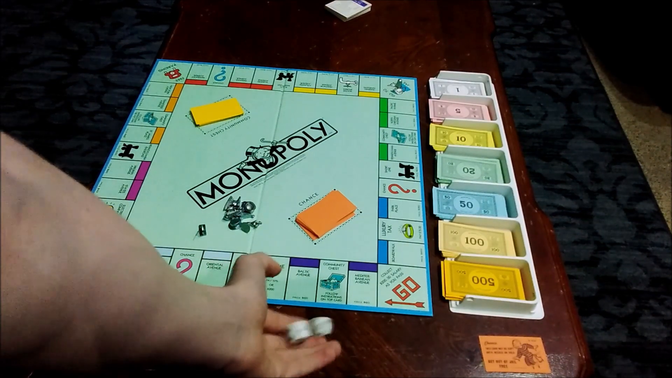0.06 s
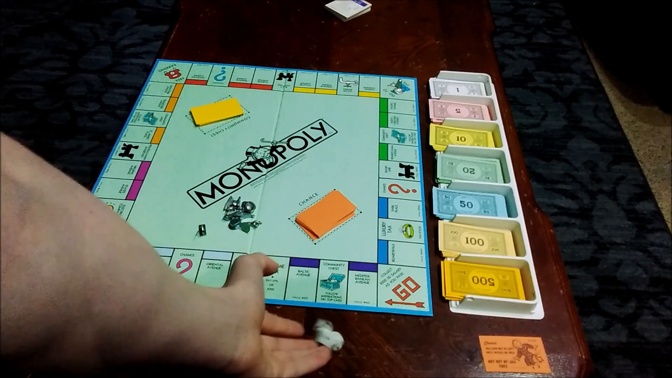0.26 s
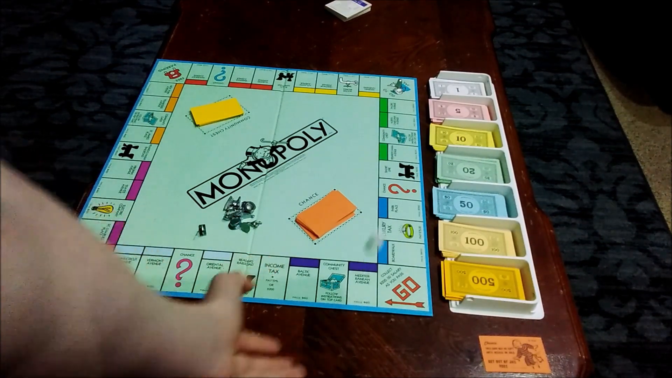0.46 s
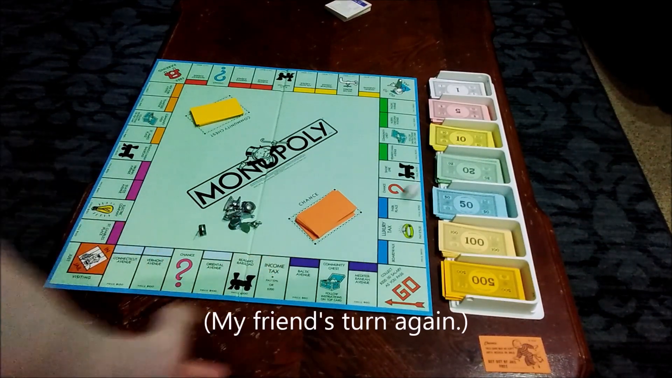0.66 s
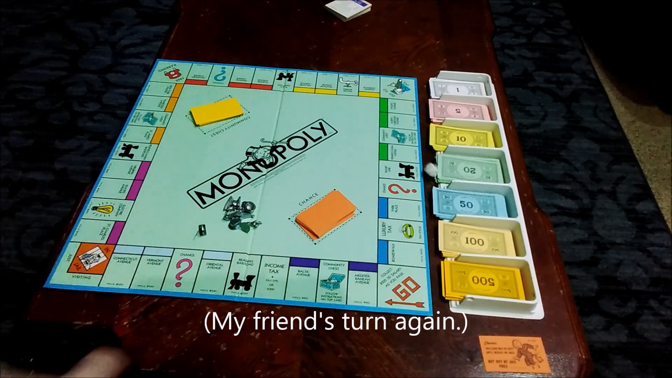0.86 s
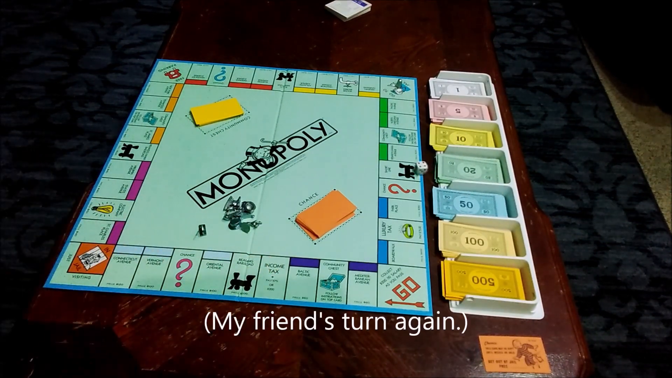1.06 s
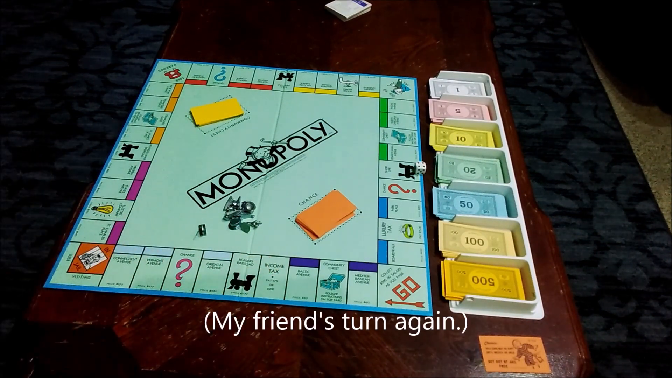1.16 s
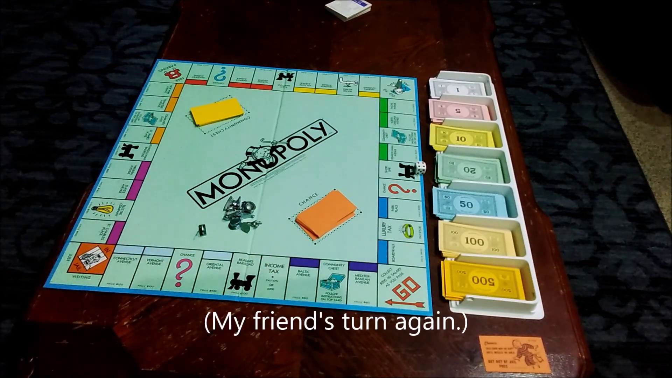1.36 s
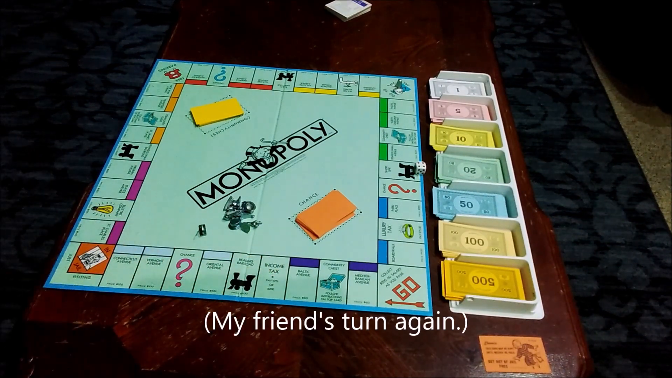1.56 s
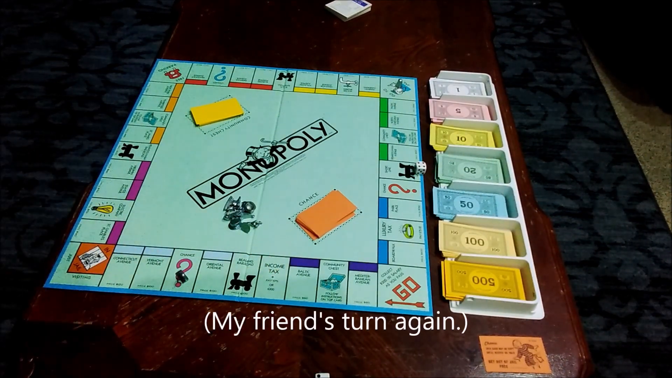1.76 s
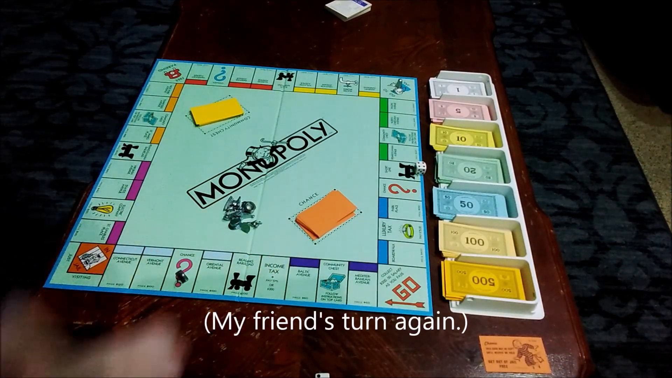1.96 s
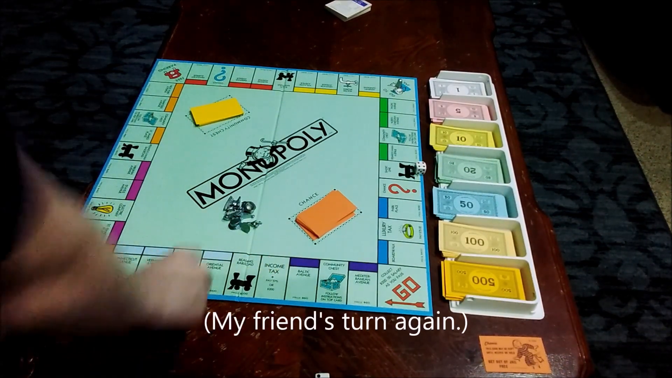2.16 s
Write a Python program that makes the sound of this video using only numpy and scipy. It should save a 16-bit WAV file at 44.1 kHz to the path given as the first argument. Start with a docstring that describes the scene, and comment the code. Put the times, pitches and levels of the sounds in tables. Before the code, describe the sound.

Two plastic dice thrown on a cardboard game board bounce, clack together, roll and knock a tray

```python
"""Over steady hum and hiss, two plastic dice are thrown on a cardboard game board lying on a wooden table.
They bounce, clack together, roll away and knock the tray at the far edge; the last tips over with a dull thud.
The sound then drops out for a moment, and later comes one faint tick. Blows are short coloured clicks,
answered by nearby surfaces and a small furnished room; the wood adds damped sines, and hum and hiss are
filtered noise."""
import sys
import numpy as np
from scipy import signal
from scipy.fft import rfft, irfft, next_fast_len
from scipy.io import wavfile
from scipy.ndimage import map_coordinates

SR = 44100
rng = np.random.default_rng(int(sys.argv[2]) if len(sys.argv) > 2 else 0)


def materialize(psi):
    """Save the field psi as 16-bit PCM at rate SR to the path in sys.argv[1].

    A 1-D psi becomes a single channel; in a 2-D psi each row is a channel.
    """
    bounded = np.clip(np.atleast_2d(psi).T, -1, 1)
    quanta = np.round(bounded * 32767).astype(np.int16)
    wavfile.write(sys.argv[1], SR, quanta)


def boost(x):
    """Linear amplitude factor 10**(x/20) for a level x in decibels (scalar or array-like)."""
    u = np.asarray(x, float) / 20
    return 10 ** u


N = 97020  # length in samples

# colour of a blow on the board: f/Hz, level/dB
BOARD_COLOUR = [(20, -78.5), (130, -37.5), (300, -23), (800, -11), (1400, -0.5), (2200, -0.5), (3000, -10),
                (4500, -14.5), (5300, -19), (6000, -44), (16000, -65.5)]
# colour of a blow on the hard plastic die: f/Hz, level/dB
DIE_COLOUR = [(20, -82), (3000, -35), (5500, -17.5), (6800, 1), (7900, 6), (9500, -4.5), (12000, -10),
              (16000, -25.5)]
# ringing modes of the wooden table: f/Hz, level/dB, time to fall by 60 dB/s
WOOD_MODES = [(161.5, -4, 0.31), (221.4, -6, 0.69), (279.4, -1.5, .25), (346.4, 3, .3), (477, 2, 0.32),
              (588.5, 0.5, 0.19), (737, -0.5, .3), (885, 1.5, 0.17), (1428, 1.5, 0.27), (1720, -5.5, .2),
              (1900, -7.5, 0.6), (2220, -8.5, .15)]
SCATTER_DB = 1.5  # how much the colour varies from blow to blow


def unit(x):
    """Scale a sound to an rms of 1."""
    return x / np.sqrt(np.mean(x ** 2) + 1e-20)


def along(points, hz):
    """Read a curve of (Hz, value) points, with straight lines on a log frequency axis."""
    f, v = np.transpose(points)
    return np.interp(np.log(hz + 1), np.log(f + 1), v)


def filtered(x, response):
    """Filter a sound by multiplying its spectrum by a response of frequency."""
    m = next_fast_len(len(x) + 8192)
    spectrum = rfft(x, m) * response(np.fft.rfftfreq(m, 1 / SR))
    return irfft(spectrum, m)[:len(x)]


def add(track, s, sound):
    """Mix a sound into a track at time s, in seconds."""
    part = track[round(s * SR):][:len(sound)]
    part += sound[:len(part)]


def room_tone():
    """Hiss and rumble are shaped noise; a narrow band of noise makes a hum that wavers."""
    # colour of the hiss and rumble: f/Hz, level/dB (per Hz)
    air_colour = [(12, -10), (20, 1.5), (91, -11.5), (123, -2.5), (146, -13.5), (241, -14), (277, -17),
                  (422, -19.5), (1150, -26.5), (1440, -29.5), (16000, -36)]
    air_db, hum_db = -58, -70.5  # rms levels
    hum_hz, hum_width_hz = 127, 8
    air = unit(filtered(rng.standard_normal(N), lambda hz: boost(along(air_colour, hz))))
    hum = unit(filtered(rng.standard_normal(N), lambda hz: np.exp(-((hz - hum_hz) / hum_width_hz) ** 2)))
    return boost(air_db) * air + boost(hum_db) * hum


def space(direct_db=0, near_db=0, room_db=0):
    """A fresh answer to one blow: direct sound, near surfaces with board chatter, and the room's tail."""
    # how long the room rings: f/Hz, time to fall by 60 dB/s
    room_t60 = [(100, 0.15), (400, 0.46), (2000, 0.51), (5000, 0.45), (9000, 0.39), (14000, .2)]
    # colour of the room's tail: f/Hz, level/dB
    tail_colour = [(100, -1), (500, -3.5), (1100, -6), (2000, -4.5), (3500, 0), (5000, -4), (9000, -6),
                   (14000, -6)]
    # echoes from nearby surfaces: delay/s, level/dB
    near_echoes = [(.0022, -14.5), (.0030, -9), (.0044, -11.5), (.0053, -7.5), (.009, -15), (.013, -22.5)]
    # colour that the nearby surfaces give back: f/Hz, level/dB
    near_colour = [(20, -3.5), (700, -9.5), (1500, -9), (2250, 2), (3200, -2.5), (6000, 0.5), (16000, -9)]
    chatter_db, chatter_t60 = 1, 0.019  # the loose board chatters after a blow: dB, s
    tail_db, tail_rise_s = 2, 0.0032
    # The tail is noise in which each frequency dies away at its own rate.
    hz, t, z = signal.stft(rng.standard_normal(SR // 2), SR, nperseg=256)
    colour_db = along(tail_colour, hz)[:, None]
    decay_db = 60 * t / along(room_t60, hz)[:, None]
    tail = signal.istft(z * boost(colour_db - decay_db), SR, nperseg=256)[1]
    t = np.arange(len(tail)) / SR
    rise = 1 - np.exp(-t / tail_rise_s)
    near = rng.standard_normal(len(t)) * boost(-60 * t / chatter_t60)
    near *= boost(chatter_db) / np.linalg.norm(near)
    for delay, db in near_echoes:
        near[round(delay * SR)] += boost(db)
    near = filtered(near, lambda hz: boost(along(near_colour, hz)))
    answer = boost(tail_db + room_db) * tail * rise / np.sqrt(SR / 40) + boost(near_db) * near
    answer[0] = boost(direct_db)  # the direct sound
    return answer


def blow(colour, scatter_db=0):
    """One impulse with a body's colour, its energy as early as possible (minimum phase), peak 1."""
    points = np.array(colour, float) + [0, scatter_db] * rng.standard_normal((len(colour), 1))
    log_spectrum = np.log(boost(along(points, np.fft.rfftfreq(4096, 1 / SR))))
    # Folding the cepstrum onto positive times gives minimum phase.
    cepstrum = irfft(log_spectrum)
    cepstrum[1:2048] *= 2
    cepstrum[2049:] = 0
    click = irfft(np.exp(rfft(cepstrum)))[:2048]
    return click / np.abs(click).max()


def ringing(modes):
    """Damped sines of a struck body, with a slightly new level for each mode and blow."""
    t = np.arange(SR // 3) / SR
    out = np.zeros(len(t))
    for hz, db, t60 in modes:
        level_db = db + rng.normal(0, 1.2)
        out += boost(level_db - 60 * t / t60) * np.sin(2 * np.pi * hz * t)
    return out


def tick():
    """A faint dry tick: one coloured impulse with no echoes."""
    # the tick: t/s, peak level/dB
    ticks = [(1.832, -39)]
    # colour of the tick: f/Hz, level/dB
    tick_colour = [(20, -60), (500, -17), (1100, 5), (2400, -5.5), (5000, -19), (16000, -33.5)]
    out = np.zeros(N)
    for s, db in ticks:
        add(out, s, boost(db) * blow(tick_colour))
    return out


def tumbling():
    """Small random contacts of corners and faces, bunched in clumps, while the dice roll."""
    # loudness of the tumbling over time: t/s, level/dB
    roll_level = [(.36, -41), (.4, -50.5), (.47, -26.5), (.53, -38.5), (0.622, -53), (.7, -31.5),
                  (.76, -34), (.83, -45.5)]
    # colour of corners skimming the board: f/Hz, level/dB
    rattle_colour = [(20, -69), (2000, -33), (3500, 1.5), (5500, -2), (7000, 1.5), (9000, -14),
                     (16000, -21)]
    contacts_per_s, size_scatter_db = 340, 3
    clump_knots_per_s, clump_depth_db = 45, 2
    rattle_db = -8.5  # rattle relative to knock
    t = np.arange(N) / SR
    when, db = np.transpose(roll_level)
    roll_db = np.interp(t, when, db, -150, -150)  # all but silent outside the roll
    knots = rng.standard_normal(int(N * clump_knots_per_s / SR) + 4)
    clump_db = clump_depth_db * map_coordinates(knots, [t * clump_knots_per_s])
    happens = rng.random(N) < contacts_per_s / SR
    # Each contact makes a knock and a rattle, each with its own random size.
    size_db = size_scatter_db * rng.standard_normal((2, N))
    knock_hits, rattle_hits = happens * boost(clump_db + roll_db + size_db)
    knock = signal.fftconvolve(knock_hits, blow(BOARD_COLOUR))
    rattle = signal.fftconvolve(rattle_hits, blow(rattle_colour))
    contacts = knock + boost(rattle_db) * rattle
    return signal.fftconvolve(contacts, space(direct_db=-4))[:N]


def tip_over():
    """The last die falls on its face: a dull thud, with table modes ringing under it."""
    # the fall: t/s, peak level of the blow/dB
    falls = [(1.1815, -15.5)]
    # colour of the flat thud: f/Hz, level/dB
    flat_colour = [(20, -34), (90, -2.5), (145, -1), (300, 0), (600, -4.5), (950, -9), (1150, -15),
                   (1700, -13.5), (3000, -32.5), (5000, -53.5), (16000, -53)]
    # the table's lowest modes: f/Hz, level/dB, time to fall by 60 dB/s
    boom_modes = [(120.7, -34, 0.61), (146.1, -22, 0.49), (173.6, -23, .35)]
    wood_db = -40  # upper wood modes under the thud
    out = np.zeros(N)
    for s, db in falls:
        thud = signal.fftconvolve(blow(flat_colour), space(near_db=-4.5, room_db=-6))
        add(out, s, boost(db) * thud)
        table = boost(wood_db) * ringing(WOOD_MODES) + ringing(boom_modes)
        add(out, s, boost(db) * table)
    return out


def tray_knocks():
    """A die knocks against the tray, each blow taking the tray's colour and its own near echoes."""
    # knocks: t/s, peak level of the blow/dB, near echoes/dB
    knocks = [(.837, -14.5, 0), (0.9421, -14.5, 1.5), (0.9887, -17, -3), (1.0274, -21.5, -1.5)]
    # colour of the tray: f/Hz, level/dB
    tray_colour = [(20, -53), (200, -13.5), (600, -9), (1300, -5), (1750, -3), (2030, -1.5), (2500, -12),
                   (3300, -17.5), (4500, -32.5), (6000, -34.5), (8300, -32.5), (16000, -48)]
    out = np.zeros(N)
    for s, db, near_db in knocks:
        hit = boost(db) * blow(tray_colour, SCATTER_DB)
        add(out, s, signal.fftconvolve(hit, space(near_db=near_db)))
    return out


def clacks():
    """Die hits die: a bright click whose colour is shifted up or down in pitch each time."""
    # clacks: t/s, peak level of the blow/dB, pitch factor, direct click/dB (against its echoes)
    clack_list = [(.3594, -5, 0.98, 3), (.3641, -10, 1.2, 1), (.3732, -13, 0.7, -1),
                  (.4755, -19.5, 0.68, -6), (.4792, -14, .9, 0.5), (.6442, -24.5, 0.74, -2.5),
                  (.6485, -33.5, .82, 6.5), (.688, -38, 1.2, -1), (.6978, -27, 0.87, 4),
                  (.8372, -25.5, 0.98, -4.5), (.844, -41, 1.294, 0)]
    out = np.zeros(N)
    for s, db, pitch, direct_db in clack_list:
        shifted_colour = np.multiply(DIE_COLOUR, [pitch, 1])
        hit = boost(db) * blow(shifted_colour, SCATTER_DB)
        add(out, s, signal.fftconvolve(hit, space(direct_db, near_db=-12)))
    return out


def bounces():
    """A die meets the board: board knock, table thud and edge tick together, then the wood rings."""
    # bounces: t/s, board knock/dB, table thud/dB, die edge tick/dB, direct click/dB (against its echoes)
    bounce_list = [(0.234, -39, -51, -62, -4), (0.2368, -2.5, -16, -16.5, 0.5),
                   (.3555, -5.5, -22.5, -20.5, -5), (.369, -16, -25.5, -29.5, 0.5),
                   (.373, -14.5, -28.5, -17.5, -2), (.381, -17, -25.5, -46, 4.5),
                   (.4125, -19, -54, -36, -4.5), (.4585, -25.5, -37, -34.5, 6.5), (.477, -15, -62, -15, -6),
                   (.5003, -27, -35.5, -49, -16.5), (.5033, -22.5, -36.5, -48, -4.5),
                   (0.539, -17, -38, -30.5, -10), (.5545, -24, -40, -28.5, -14.5),
                   (.574, -26.5, -34.5, -32.5, -3), (0.5889, -18, -40.5, -36, -10),
                   (.6465, -17.5, -39, -43, -6.5), (.6975, -48, -38, -27.5, -12.5),
                   (.7355, -26.5, -42, -50, -9), (.768, -25, -35, -37.5, -8)]
    # colour of the table's thud: f/Hz, level/dB
    table_colour = [(20, -56), (90, -30), (130, -8.5), (240, 2.5), (350, 1), (550, -1), (900, 0.5),
                    (2000, -68.5), (16000, -85)]
    wood_db = -18.5  # wood modes relative to the thud
    out = np.zeros(N)
    for s, knock_db, thud_db, edge_db, direct_db in bounce_list:
        knock = boost(knock_db) * blow(BOARD_COLOUR, SCATTER_DB)
        thud = boost(thud_db) * blow(table_colour, SCATTER_DB)
        edge = boost(edge_db) * blow(DIE_COLOUR, SCATTER_DB)
        add(out, s, signal.fftconvolve(knock + thud + edge, space(direct_db)))
        add(out, s, boost(thud_db + wood_db) * ringing(WOOD_MODES))
    return out


def scene():
    """All sources in one channel; a high-pass thins the deep bass of the hits."""
    low_cut_hz = 110  # hits are cut below this
    hits = tumbling() + tip_over() + tray_knocks() + clacks() + bounces()
    hits = signal.sosfilt(signal.butter(3, low_cut_hz, "high", fs=SR, output="sos"), hits)
    return (room_tone() + tick() + hits)[None]


def low_pass(x):
    """Removes everything above the highest recorded frequency."""
    return signal.sosfilt(signal.butter(12, 16980, fs=SR, output="sos"), x)


def record(dry):
    """Cut the highest treble, then let the level drop out for a moment."""
    top_hz = 15900
    dropout_start_s, dropout_end_s, dropout_db = 1.678, 1.711, -34.5
    t = np.arange(N) / SR
    in_dropout = (t > dropout_start_s) & (t < dropout_end_s)
    gate = np.where(in_dropout, boost(dropout_db), 1)
    limited = filtered(dry[0], lambda hz: hz < top_hz)
    mix = (limited * gate)[None]
    return low_pass(mix)


dry = scene()
out = record(dry)
materialize(out)
```